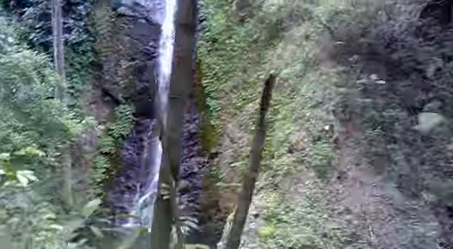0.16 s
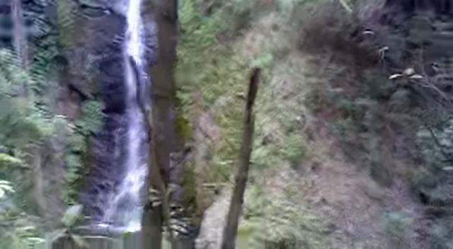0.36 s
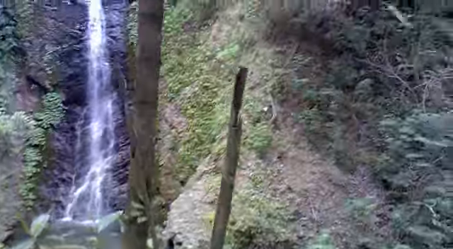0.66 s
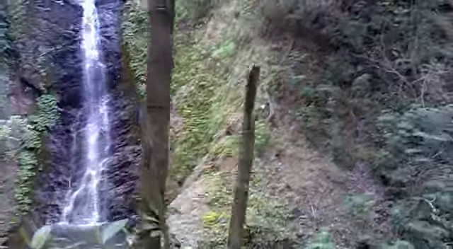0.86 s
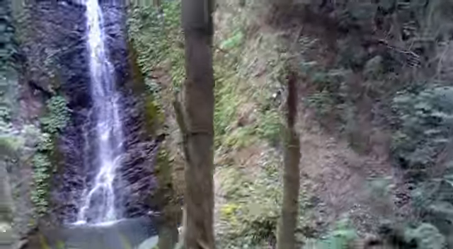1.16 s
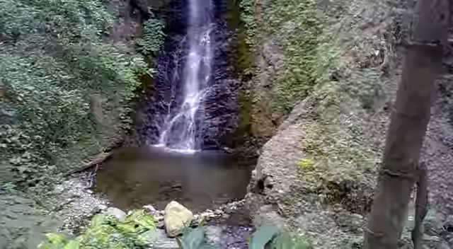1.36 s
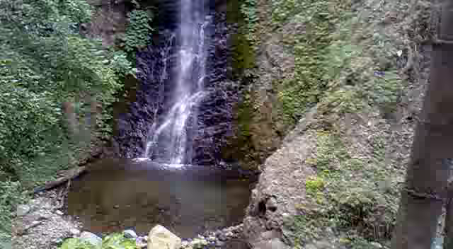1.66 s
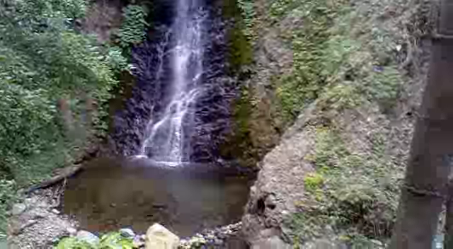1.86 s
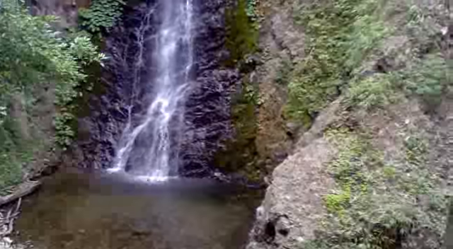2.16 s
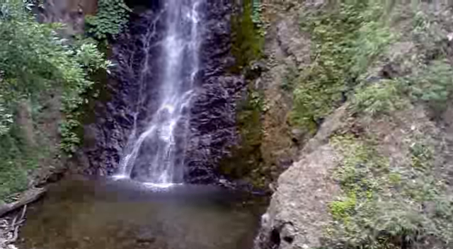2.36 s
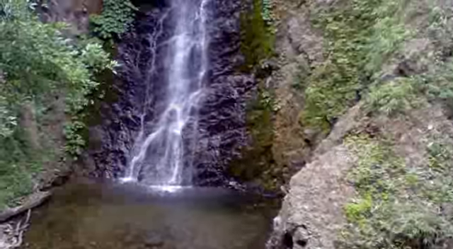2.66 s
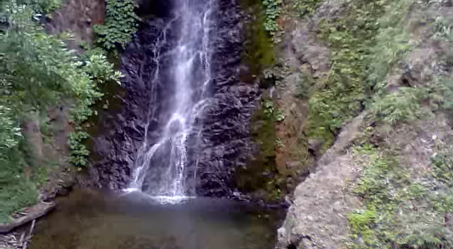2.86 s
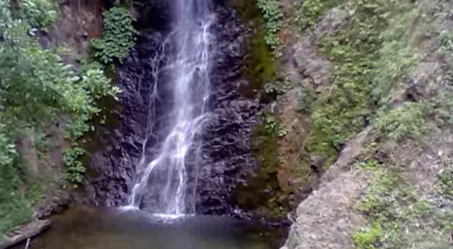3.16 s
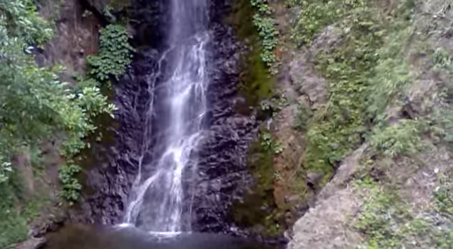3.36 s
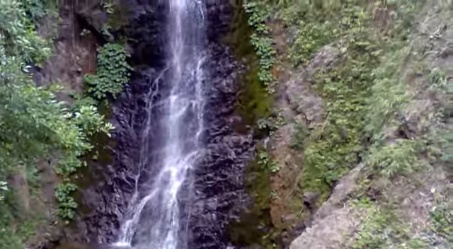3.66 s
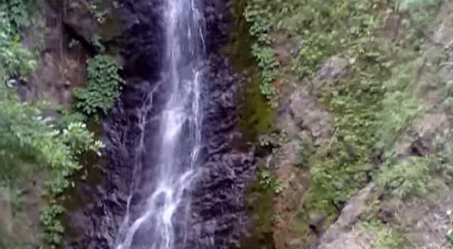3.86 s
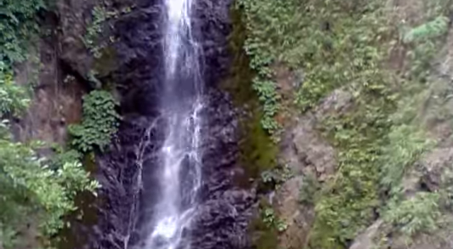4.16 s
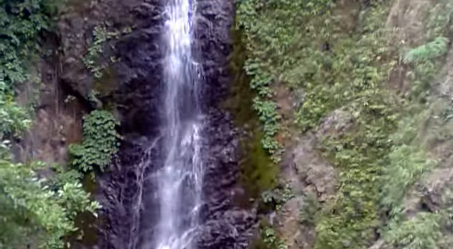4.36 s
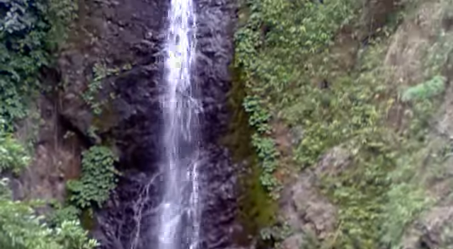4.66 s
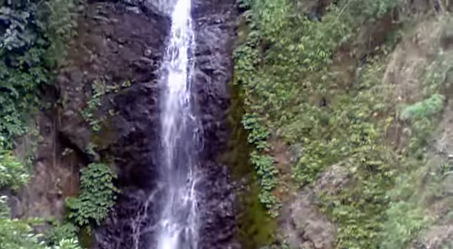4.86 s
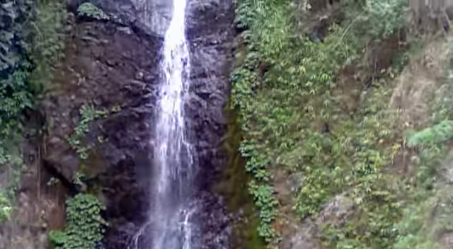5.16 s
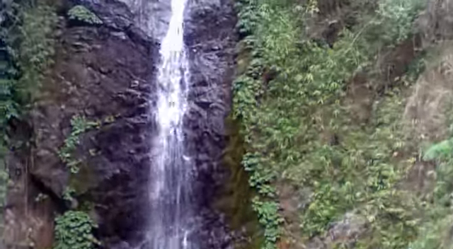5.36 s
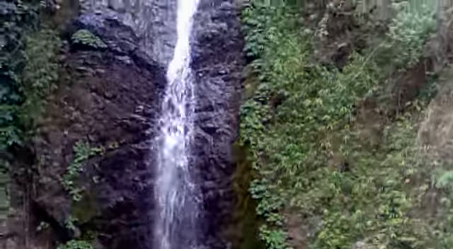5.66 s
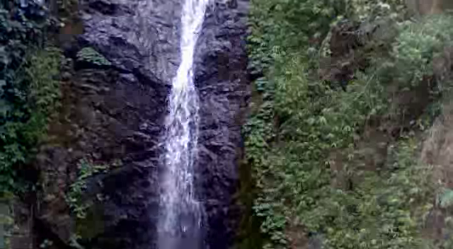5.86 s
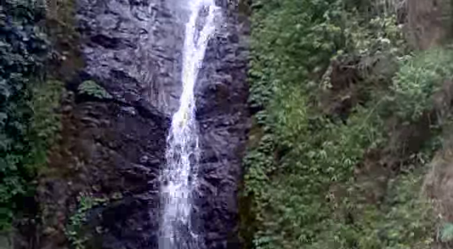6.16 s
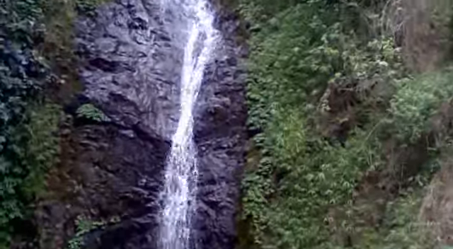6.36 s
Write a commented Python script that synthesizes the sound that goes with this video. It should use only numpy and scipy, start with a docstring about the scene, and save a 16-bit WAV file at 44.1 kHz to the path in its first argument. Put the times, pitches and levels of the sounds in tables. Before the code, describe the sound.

A thin waterfall pours down rock into a forest pool, heard fairly quietly through one hand-held microphone. From the start there is a steady, even rush of countless drops, with fine splashes, tiny ringing bubbles and gurgles blended in over a low rumble. At about 0.9 seconds the sound fades, reaching near silence at 1.4 seconds, and is back by 1.9 seconds, slightly fuller, as if the listener has moved from behind the trees to the pool. The water then runs on until the end at about 6.4 seconds, swelling gently around 2.4, 4.5, 5.3 and 6 seconds. Soft, dull handling bumps sit low within the rush: one at 1.9 seconds, a quick pair at 2.1, and others near 2.9, 4.1, 5.3 and 5.6 seconds. A very faint, short high hiss brushes past at about 3.7 seconds.

```python
"""Thin waterfall in a forest

A thin waterfall runs down a rock face into a forest pool, heard through one hand-held microphone.
Countless drops blend into a wash that carries splashes, ringing bubbles and gurgles, over a low rumble.
The water swells in gushes. It fades out behind the trees and fades in nearer the pool,
where the hand bumps the camera a few times and a faint hiss brushes past."""
import sys
import numpy as np
from scipy import signal
from scipy.fft import rfft, irfft
from scipy.io import wavfile
from scipy.ndimage import uniform_filter1d

SR = 44100
rng = np.random.default_rng(int(sys.argv[2]) if len(sys.argv) > 2 else 0)


def wav_record(signal):
    """Record a signal, one row per channel, as 16-bit PCM in the file named by sys.argv[1]."""
    frames = np.transpose(np.atleast_2d(signal))
    bounded = np.clip(frames, -1, 1)
    # unit amplitude maps onto the largest positive 16-bit level
    quanta = np.round(bounded * 32767).astype(np.int16)
    wavfile.write(sys.argv[1], SR, quanta)


N = 286650
MOVE_S = 1.405  # when the listener's place switches from the trees to the pool


def waterfall(splash_db=-13, bubble_db=-18, gurgle_db=-21, rumble_db=-26, trees_db=-49.5, pool_db=-48.5):
    """The same water heard from two places in turn, with the rumble of the plunge under it."""
    # tone of the rush behind the trees: pitch_hz, relative_db
    behind_trees = [(59, -40), (100, -10.5), (326, -13), (519, -9.5), (589, -8), (654, -8.5), (808, -10.5),
                    (977, -6), (2000, -1.5), (2750, -9), (4000, -5), (4660, -5), (6660, -16.5),
                    (8230, -16.5), (12300, -25.5), (15500, -27)]
    # tone of the rush in the open by the pool: pitch_hz, relative_db
    by_pool = [(59, -48), (100, -15.5), (243, -10.5), (440, -12.5), (600, -7.5), (900, -6), (1550, -2.25),
               (1920, -1), (2270, -4.5), (3180, -8.5), (4190, -1.6), (4660, -3.5), (5400, -11), (8580, -19),
               (11500, -20.5), (15500, -26.5)]
    # tone of the water plunging into the pool: pitch_hz, relative_db
    plunge = [(15, 1), (30, -0.5), (45, -0.5), (70, -2.5), (110, -5), (200, -33), (400, -44)]
    water = wash() + gain_of(splash_db) * splashes()
    water += gain_of(bubble_db) * bubbles() + gain_of(gurgle_db) * gurgles()
    rumble = gain_of(rumble_db) * with_tone(rng.standard_normal(N), plunge)
    trees = gain_of(trees_db) * (with_tone(water, behind_trees) + rumble)
    pool = gain_of(pool_db) * (with_tone(water, by_pool) + rumble)
    return gushes(np.where(np.arange(N) / SR < MOVE_S, trees, pool))


def wash(patchy_db=1.04, flicker_db=0.34):
    """Countless far drops blend into noise, with patches that swell as clumps of water land."""
    size, hop = 256, 64  # samples in a slice of sound, and between slices
    # three random grids: a row for each moment, a column for each pitch
    real, imag, patches = rng.standard_normal((3, N // hop + 5, size // 2 + 1))
    patches = uniform_filter1d(patches, size=36, axis=0)  # smooth over time
    patches = unit_level(uniform_filter1d(patches, size=5, axis=1))  # and over pitch
    flicker = unit_level(uniform_filter1d(rng.standard_normal(len(real)), size=30))[:, None]
    # the finest spray is steadier than the heavy water
    unrest = value_at([(500, 0.58), (2000, 0.51), (12000, 0.52)], np.fft.rfftfreq(size, 1 / SR))
    slices = (real + 1j * imag) * gain_of(unrest * (patchy_db * patches + flicker_db * flicker))
    return unit_level(signal.istft(slices.T, nperseg=size, noverlap=size - hop)[1][:N])


def splashes(per_s=420, spread_db=1.0, decay_s=0.0016, bands=16):
    """Lumps of water slap the rock: short bursts of noise, each in its own range of pitch."""
    t, out = np.arange(SR // 20) / SR, np.zeros(N)
    for hz in np.geomspace(900, 7000, bands):
        slaps = signal.oaconvolve(impacts(per_s / bands, spread_db), np.exp(-t / decay_s))[:N]
        bursts = slaps * rng.standard_normal(N)
        band = signal.butter(1, [hz / 2.1, hz * 1.77], "band", fs=SR, output="sos")
        out += signal.sosfilt(band, bursts) / hz ** 0.26
    return unit_level(out)


def bubble_ring(t, hz, cycles, rise):
    """One bubble rings and rises a little in pitch, dying to about a third after `cycles` vibrations."""
    age = hz * t / cycles
    return np.sin(2 * np.pi * hz * t * (1 + rise * np.minimum(age, 2))) * np.exp(-age)


def bubbles(per_s=500, spread_db=2.0, pitches=40):
    """Air driven into the pool makes many small bubbles that each ring briefly."""
    t, out = np.arange(SR // 10) / SR, np.zeros(N)
    for hz in np.geomspace(700, 5000, pitches) * rng.uniform(0.99, 1.03, pitches):
        births = impacts(per_s / pitches, spread_db)
        ring = bubble_ring(t, hz, cycles=8, rise=0.03)
        out += signal.oaconvolve(births, ring)[:N] * np.sqrt(hz)  # equal energy at every pitch
    return unit_level(out)


def gurgles(per_s=30, length_s=0.035, bubbles_per_s=90, pitches=18):
    """Pockets of air break up in the pool: little runs of bubbles of nearly one pitch."""
    t, out = np.arange(SR // 4) / SR, np.zeros(N)
    breakup = t / length_s * np.exp(-2 * t / length_s)
    for hz in np.geomspace(1200, 2400, pitches) * rng.uniform(0.96, 1.02, pitches):
        pockets = signal.oaconvolve(impacts(per_s / pitches, spread_db=0.5), breakup)[:N]
        births = pockets * (rng.random(N) < bubbles_per_s / SR)
        ring = bubble_ring(t, hz, cycles=14, rise=0.022)
        out += signal.oaconvolve(births, ring)[:N] * np.sqrt(hz)
    return unit_level(out)


def gushes(water, reach_octaves=2.15, wander_db=0.08):
    """The water comes down in gushes, each swelling a broad range of pitch around its own centre."""
    # swells of the water: middle_s, length_s, swell_db, centre_hz
    # the negative row keeps the treble softer while the sound fades back in
    swells = [(0.116, 0.12, 2, 1900), (1.122, 0.085, 6, 1600), (1.62, 0.22, -2, 5500),
              (2.158, 0.2, 1.4, 3500), (2.38, 0.036, 3, 1900), (2.483, 0.044, 2.5, 750),
              (3.67, 0.12, 1.2, 650), (4.4, 0.11, 1.3, 1400), (4.53, 0.089, 2.2, 2100),
              (5.108, 0.23, 1.1, 5200), (5.277, 0.17, 2, 1600), (5.47, 0.2, 0.5, 4000), (5.98, 0.3, 1, 900),
              (6.08, 0.27, 1.3, 4500)]
    hz, t, slices = signal.stft(water, SR, nperseg=512)
    for middle_s, length_s, swell_db, centre_hz in swells:
        band = np.exp(-(np.log2((hz + 1) / centre_hz) / reach_octaves) ** 2)
        slices *= gain_of(swell_db * np.outer(band, hump(t, middle_s, length_s)))
    return signal.istft(slices, SR, nperseg=512)[1][:N] * gain_of(wander_db * wander())


def wander(slowest_hz=2.006, fastest_hz=8, count=24):
    """The flow drifts at random: a sum of slow waves, the faster ones weaker."""
    t = np.arange(N) / SR
    rates = np.geomspace(slowest_hz, fastest_hz, count)
    return unit_level(sum(np.sin(2 * np.pi * (hz * t + rng.random())) / np.sqrt(hz) for hz in rates))


def hand_bumps(case_hz=550, case_decay_s=0.0028):
    """Each bump of the hand pushes the camera body once and makes its plastic case ring dully."""
    # bumps on the camera: time_s, push_db, push_pitch_hz, knock_db
    bumps = [(1.929, -60, 330, -48), (2.097, -47.5, 185, -48), (2.111, -51.5, 300, -49),
             (2.932, -55, 150, -58), (4.0594, -49, 193, -49), (5.307, -47.5, 191, -53),
             (5.642, -53, 200, -64)]
    out = np.zeros(N)
    for time_s, push_db, push_hz, knock_db in bumps:
        t = np.arange(N) / SR - time_s
        away, after = (np.pi * push_hz * t) ** 2, np.maximum(t, 0)
        push = (1 - 2 * away) * np.exp(-away)  # one pulse, with a shallow recoil on either side
        knock = np.sin(2 * np.pi * case_hz * after) * np.exp(-after / case_decay_s)
        out += gain_of(push_db) * push + gain_of(knock_db) * knock
    return out


def brief_hiss(middle_s=3.657, length_s=0.044, level_db=-60):
    """A faint, short swell of high hiss."""
    hiss = with_tone(rng.standard_normal(N), [(3000, -25), (6000, 3), (11000, -1), (15500, -8)])
    return gain_of(level_db) * hiss * hump(np.arange(N) / SR, middle_s, length_s)


def impacts(per_s, spread_db):
    """Clicks at random moments: mostly small, a few larger."""
    strength = gain_of(spread_db * np.minimum(rng.exponential(1, N), 4))
    return strength * (rng.random(N) < per_s / SR)


def hump(x, centre, width):
    """A smooth bell shape that reaches 1 at its centre."""
    return np.exp(-(2 * (x - centre) / width) ** 2)


def gain_of(db):
    """Turns decibels into a number to multiply a sound by."""
    return 10 ** (np.asarray(db) / 20)


def unit_level(x):
    """Scales x to an average (rms) level of 1."""
    return x / np.sqrt(np.mean(x ** 2) + 1e-20)


def value_at(points, hz):
    """Joins (pitch_hz, value) points with lines on a scale of octaves and reads them at hz."""
    pitches, values = np.transpose(points)
    return np.interp(np.log(hz + 1), np.log(pitches + 1), values)


def with_tone(x, tone):
    """Shapes x with (pitch_hz, relative_db) points, then sets its level to 1."""
    tone_db = value_at(tone, np.fft.rfftfreq(N, 1 / SR))
    return unit_level(irfft(rfft(x) * gain_of(tone_db), N))


def scene():
    """Water, bumps and hiss reach one microphone, which feeds both channels."""
    return np.tile(waterfall() + hand_bumps() + brief_hiss(), (2, 1))


def record(dry, fade_s=0.5, fade_db=-48, top_hz=15800):
    """The microphone colours the sound, it fades out and in at the move, and the top treble is cut."""
    # small peaks and dips in tone from the microphone's opening: centre_hz, width_hz, change_db
    ripples = [(710, 110, 1), (1780, 170, -0.6), (2014, 190, 1), (3800, 580, 1.4), (5250, 450, -1.5),
               (5870, 150, 2.4), (7460, 1100, 1.4), (11500, 700, 0.5), (12600, 980, -1.5)]
    hz = np.fft.rfftfreq(N, 1 / SR)
    ripple_db = sum(db * hump(hz, centre, width) for centre, width, db in ripples)
    coloured = irfft(rfft(dry) * gain_of(ripple_db), N)
    dip_db = np.interp(np.arange(N) / SR, [MOVE_S - fade_s, MOVE_S, MOVE_S + fade_s], [0, fade_db, 0])
    low_pass = signal.firwin(1023, top_hz, window=("kaiser", 9), fs=SR)
    return signal.oaconvolve(coloured * gain_of(dip_db), low_pass[None], "same", axes=1)


dry = scene()
out = record(dry)
wav_record(out)
```